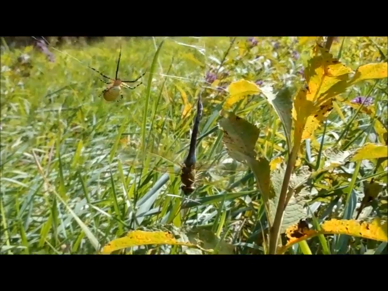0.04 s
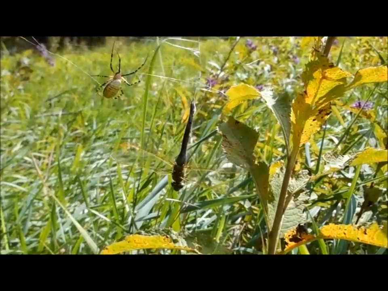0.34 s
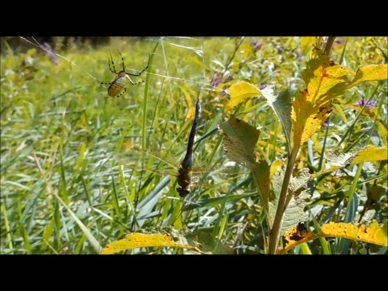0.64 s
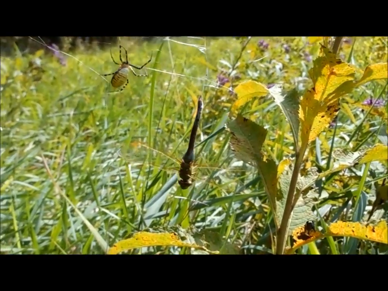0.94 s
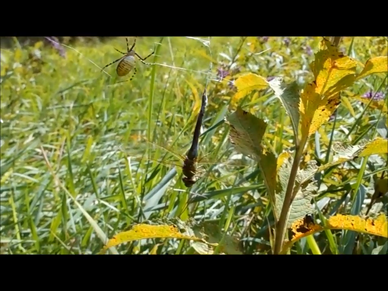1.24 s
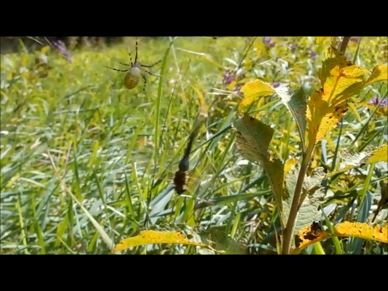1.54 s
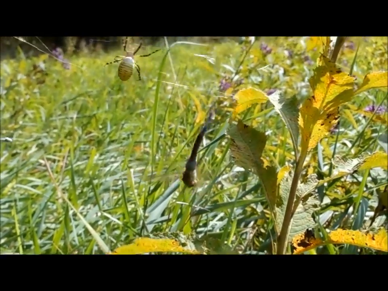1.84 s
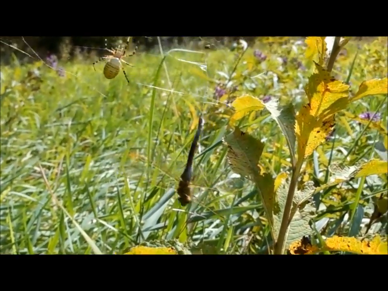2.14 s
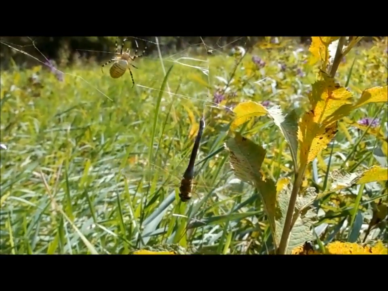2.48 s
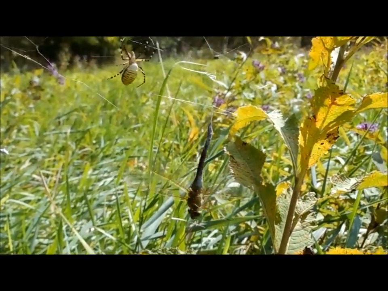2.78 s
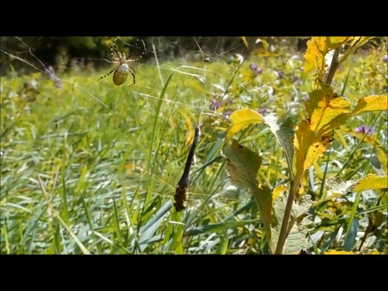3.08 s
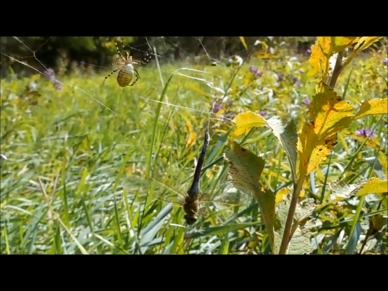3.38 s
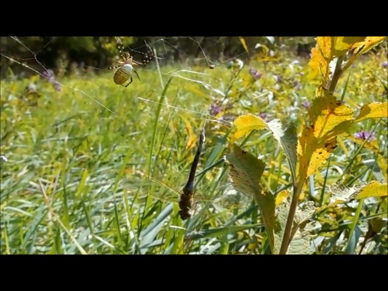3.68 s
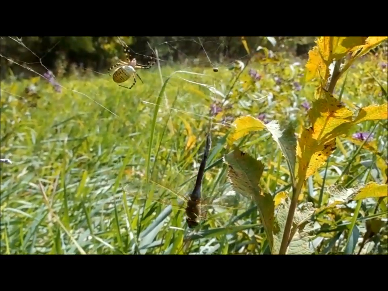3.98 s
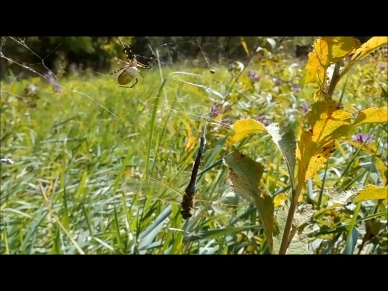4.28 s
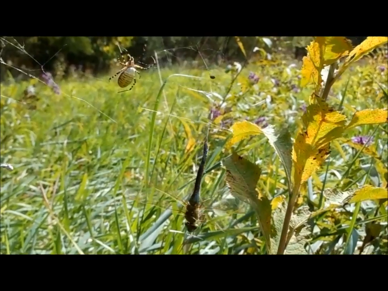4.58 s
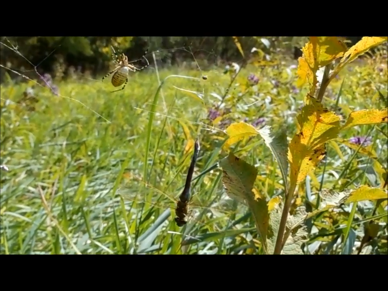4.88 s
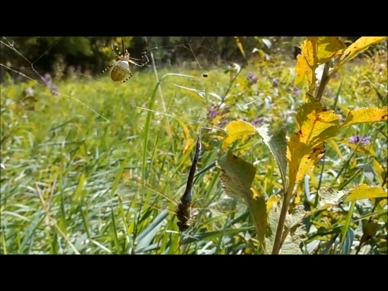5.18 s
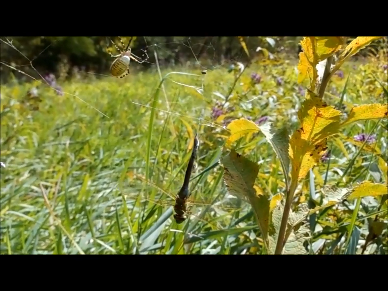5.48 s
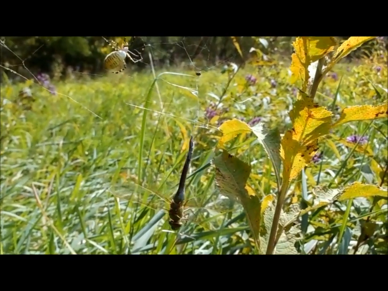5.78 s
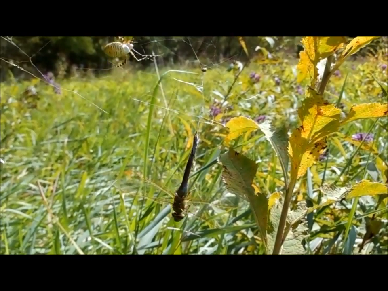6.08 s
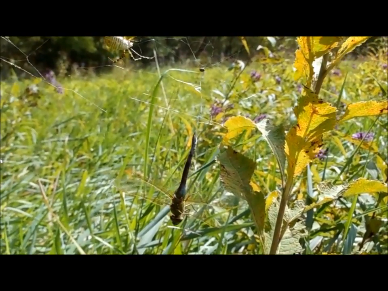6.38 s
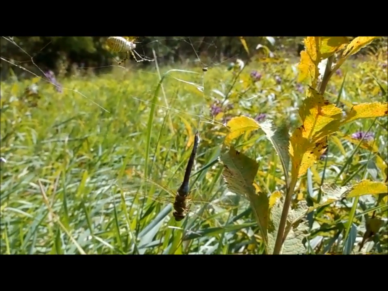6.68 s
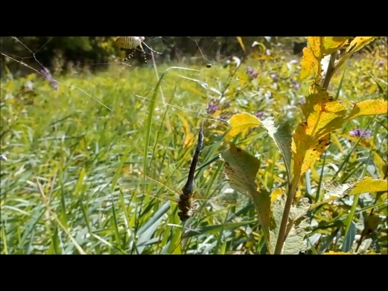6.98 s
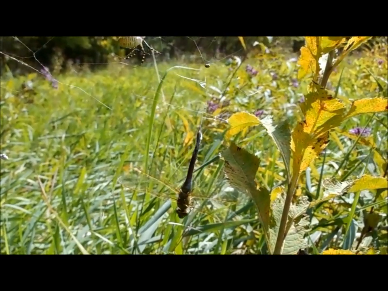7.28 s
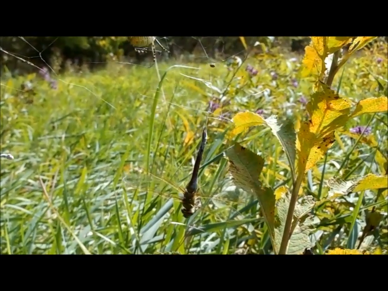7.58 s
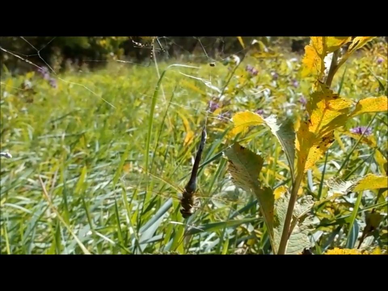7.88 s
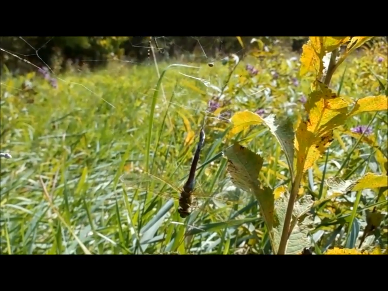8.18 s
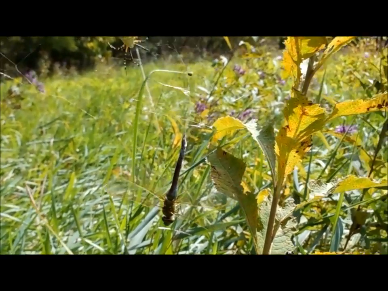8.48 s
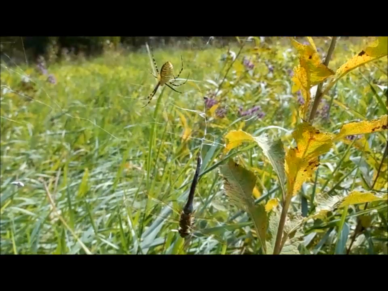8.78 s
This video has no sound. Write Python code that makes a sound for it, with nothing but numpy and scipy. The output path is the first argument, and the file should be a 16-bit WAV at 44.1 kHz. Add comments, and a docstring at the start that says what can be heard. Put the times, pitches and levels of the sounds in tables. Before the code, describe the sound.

In a grassy field, one nearby insect on the left repeats a thin, very high phrase roughly once a second: a few quick ticks, then a short swelling buzz. Early on, dry leaves rustle once. A faint, even hiss of far insects continues throughout, while light gusts rumble softly on the microphone and a barely audible distant engine hums in and out.

```python
"""Katydid in a sunny meadow

Close to the microphone, on the left, a katydid gives three or four ticks and a swelling buzz, over and
over: each wing stroke drags a row of teeth over a scraper and sets the wings ringing near 13 kHz.
Farther out in the grass, katydids and crickets make a steady hiss. Light air puffs on the microphone,
an engine drones in the distance, and dry leaves rustle once."""
import sys
import numpy as np
from scipy import signal
from scipy.fft import rfft, irfft, next_fast_len
from scipy.io import wavfile
from scipy.ndimage import map_coordinates

SR = 44100
rng = np.random.default_rng(int(sys.argv[2]) if len(sys.argv) > 2 else 0)


def unload_wav(signal):
    """Save mono or channel-first audio to the path in sys.argv[1] as 16-bit WAV at rate SR, clipped to [-1, 1]."""
    wavfile.write(
        sys.argv[1],
        SR,
        np.round(np.clip(np.atleast_2d(signal).T, -1, 1) * 32767).astype(np.int16),
    )


N = 394254
TIME = np.arange(N) / SR
FFT_SIZE = next_fast_len(N + SR // 2)
HZ = np.maximum(np.arange(FFT_SIZE // 2 + 1) * SR / FFT_SIZE, 1)
STROKES_PER_S, TEETH_PER_S = 71.0, 1850
LEAD_IN_S = .25  # a phrase opens this long before its buzz, to take in the ticks

# the near katydid's buzzes: (first stroke [s], last stroke [s], relative level [dB], swell time [s],
# shift of the main wing resonance [Hz], its lift [dB], lift of the highest resonance [dB])
BUZZES = [(-0.139, 0.401, -23.5, 0.24, -220, 2.5, 3.5), (1.23, 1.644, -22.5, 0.12, -200, 1, 2.5),
          (2.182, 2.649, -21, 0.07, 30, .5, 1), (3.277, 3.759, -19.5, 0.089, 60, 0.5, 0.7),
          (4.494, 4.946, -20, 0.1, 140, 1, 1), (5.579, 6.032, -21, 0.071, 280, 2, 2.5),
          (6.932, 7.401, -21, 0.077, -50, .5, 1.5), (8.425, 8.718, -20, 0.082, 60, 1, 1.5)]
# single hard strokes leading into a buzz: (time [s], relative level [dB])
TICKS = [(1.073, -17.5), (1.117, -16), (1.161, -15), (1.208, -15), (2.068, -15.5), (2.114, -13.5),
         (2.160, -12.5), (3.164, -14), (3.207, -13), (3.250, -12.5), (4.377, -12.5), (4.421, -12),
         (4.462, -11), (5.460, -14), (5.504, -13), (5.549, -12.5), (6.818, -14.5), (6.860, -12.5),
         (6.900, -13), (8.302, -14), (8.345, -12.5), (8.390, -11.5)]
# scraper pressure through a buzz stroke: (time from the stroke [s], relative level [dB])
BUZZ_STROKE = [(-.008, -8), (-.0062, -6.5), (-.0045, -3.5), (-.002, -1.5), (0, 0.6), (.0018, -12.5),
               (.005, -11)]
# scraper pressure through a tick, which starts harder: (time from the stroke [s], relative level [dB])
TICK_STROKE = [(0, -6), (.002, -7.5), (.0053, -5), (.008, -12.5), (0.011, -13)]
# rasp as the scraper slows at the end of a buzz stroke: (time from the stroke [s], relative level [dB])
STROKE_END = [(.0005, -26), (.0018, -4), (.0032, -10)]
# colour of that rasp: (frequency [Hz], gain [dB])
RASP_COLOUR = [(3500, -39), (4700, -32), (5500, -38.5), (6500, -15), (7700, -16.5), (9600, -3.5),
               (11000, 2), (12500, -18)]
# wing resonances; lower ones speak later, so each stroke falls in pitch:
# (frequency [Hz], width [Hz], gain [dB], lag [s])
WING_MODES = [(7890, 960, -12.5, 0.0032), (9520, 1550, -11, 0.0027), (11270, 860, -1, 0.0016),
              (12320, 910, 4.5, .0012), (13710, 803, 4, 0)]
MAIN_MODE = 3  # row of the strongest resonance
# the near singer's balance at the microphone: (frequency [Hz], left minus right [dB])
SINGER_PAN = [(7200, 0), (8800, 1), (9600, 4), (10500, 2), (11600, 2.2), (12300, 8.3), (12700, 8.3),
              (13100, 3.5), (13900, 5), (14500, 3)]
# how far its left channel lags: (frequency [Hz], phase [rad])
SINGER_PHASE = [(7500, -.1), (9000, 0), (9800, .3), (11400, .35), (12600, 1.6), (13300, 1.3), (13800, 1.2)]
# short waves leave the wings in a new pattern with every tooth: (frequency [Hz], stereo likeness [0-1])
SINGER_LIKENESS = [(7500, .99), (9000, .9), (10000, .78), (12600, .85), (13200, .55)]
# the microphone turning in the hand: (time [s], right channel's lead [samples], left minus right [dB])
MIC_TURN = [(0, 0.091, 0.5), (1.5, 0.47, 1.1), (2.5, 0.17, 0.2), (3.5, 0.099, -0.7), (4.7, .09, -0.8),
            (5.8, .08, 0.1), (7.1, .07, -0.2), (8.6, 0.052, -1)]
# hiss of the far katydids: (frequency [Hz], gain [dB])
HISS_COLOUR = [(7000, -36.5), (9200, -9), (10500, -4), (11500, -1.5), (12300, 6), (13000, 3), (14100, 7),
               (15000, -31)]
# rise and fall of that hiss: (time [s], relative level [dB])
HISS_LEVEL = [(.4, -53), (.7, -59.5), (2, -57), (2.8, -53), (4.2, -52.5), (5.05, -50), (5.4, -54.5),
              (8.2, -53), (8.9, -52)]
# cricket choruses out in the field:
# (pitch [Hz], width [Hz], relative level [dB], left minus right [dB], trill rate [Hz], trill depth [0-1])
CRICKET_CHORUSES = [(4683, 420, -12.5, 0.5, 22, 0.13), (7570, 740, -3, -3.5, 52, 0.22),
                    (7980, 790, -3.5, 12, 23, 0), (8570, 580, -1.5, 4.5, 52, 0.07)]
# rise and fall shared by the choruses: (time [s], level [dB])
CRICKET_LEVEL = [(0, -56), (1, -56.5), (2.8, -53.5), (8.9, -53)]
# murmur of the open field: (frequency [Hz], gain [dB])
MURMUR_COLOUR = [(20, -4), (40, -3.5), (65, -5.5), (115, -7), (170, -11), (250, -14), (350, -17.5),
                 (690, -18), (1300, -22), (2800, -22.5), (4000, -26.5), (6000, -30), (14000, -48)]
# the murmur between 300 and 1400 Hz: (time [s], level [dB])
MURMUR_LEVEL = [(0, -60.5), (1.3, -61), (1.7, -59.5), (3.6, -58), (7.2, -59), (8.65, -58), (8.75, -60)]
# how alike the murmur is left and right: (frequency [Hz], stereo likeness [0-1])
MURMUR_LIKENESS = [(30, 0.88), (100, 0.96), (280, 0.49), (550, 0.55), (1200, 0.91), (2600, 1), (6000, 0.88)]
# gusts on the microphone: (middle [s], length [s], rise [dB])
GUSTS = [(.3, 0.87, 10.5), (0.77, 0.098, 10), (2.618, 0.34, 7.5), (4.575, 0.41, 18), (5.46, 0.086, 12.5),
         (5.942, 0.62, 10), (8.74, 0.079, 8)]
# overtones of the distant engine: (multiple of the cycle rate [-], level [dB])
ENGINE_OVERTONES = [(4, -67.5), (5, -73), (9, -68), (10, -74), (11, -75), (14, -76.5)]
# an overtone swells or sinks as the breeze shifts: (multiple [-], middle [s], length [s], rise [dB])
ENGINE_SWELLS = [(4, 0.86, 0.86, 10), (4, 4.65, 1.5, 10), (4, 5.92, 1.12, 11), (5, 2.9, 1.4, 12),
                 (5, 5.9, 1, 6), (9, 0.31, 0.44, 4.5), (9, 1.53, 0.4, -16), (9, 2.36, 1.03, 8.5),
                 (9, 2.96, 0.14, -11), (9, 3.6, 1.03, 9.5), (9, 8.3, 2.2, 5.5), (9, 8.9, 0.28, -25),
                 (10, 0.25, 0.73, 13), (10, 3.14, 0.63, 21), (10, 3.87, .5, 12.5), (10, 5.2, 0.8, 11),
                 (10, 5.92, 0.55, 11), (11, 0.2, 0.93, 9.5), (11, 2.9, 1.2, 10.5)]
# dry leaves sliding past each other: (middle [s], length [s], relative level [dB])
LEAF_SLIDES = [(1.618, 0.16, -55), (1.783, 0.096, -56.5), (1.863, 0.025, -56), (1.9, 0.11, -66.5)]
# their loudest snaps: (time [s], relative level [dB])
LEAF_SNAPS = [(1.539, -48), (1.579, -38), (1.598, -38.5), (1.647, -34), (1.656, -36.5), (1.704, -41),
              (1.72, -33.5), (1.754, -34.5), (1.764, -36), (1.783, -35), (1.79, -36.5), (1.828, -35.5),
              (1.859, -43)]
# colour of the leaves: (frequency [Hz], gain [dB])
LEAF_COLOUR = [(500, -4), (1200, -7.5), (2700, 1), (4500, -1), (7000, 0.5), (10000, 4.5), (14000, 10)]


def from_db(db):
    """Decibels to gain."""
    return 10 ** (np.asarray(db) / 20)


def rms_one(x):
    """Scale to unit power."""
    return x / np.sqrt(np.mean(x ** 2) + 1e-20)


def in_time(rows):
    """Each column of a table over time, at every sample."""
    times, *columns = np.transpose(rows)
    return [np.interp(TIME, times, column) for column in columns]


def at_hz(points):
    """A table over frequency, joined on a log axis."""
    hz, values = np.transpose(points)
    return np.interp(np.log(HZ), np.log(hz), values)


def colour(x, gain):
    """Filter by a gain for each frequency."""
    return irfft(rfft(x, FFT_SIZE) * gain, FFT_SIZE)[..., :N]


def pan(db):
    """Left and right gains for a level difference."""
    return from_db(np.array([[.5], [-.5]]) * db)


def drift(rate):
    """A random wander of spread near one, turning `rate` times a second."""
    knots = rng.standard_normal(N // 8)
    return np.interp(TIME * rate, np.arange(len(knots)), knots)


def swell(middle_s, length_s):
    """A smooth rise to one and back, above one half for its length."""
    return .5 ** np.minimum((2 * (TIME - middle_s) / length_s) ** 2, 60)


def resonance(x, hz, width_hz):
    """Two-pole resonance with gain one at its peak."""
    radius = np.exp(-np.pi * width_hz / SR)
    feedback = [1, -2 * radius * np.cos(2 * np.pi * hz / SR), radius ** 2]
    return signal.lfilter(np.array([1, 0, -1]) * (1 - radius ** 2) / 2, feedback, x + 1e-18)


def wide_noise(gain, likeness):
    """Coloured stereo noise of unit power, partly alike left and right."""
    alike = np.clip(likeness, -.99, .99)
    mid = colour(rng.standard_normal(N), gain * np.sqrt(1 + alike))
    side = colour(rng.standard_normal(N), gain * np.sqrt(1 - alike))
    return rms_one(np.array([mid + side, mid - side]))


def buzz_strokes(start_db=-15, full_db=2.5, let_go_db=-0.5, tiring=0.029, stumble_s=0.00049):
    """Runs of wing strokes swell, slow a little and end on a lighter one: (time [s], level [dB])."""
    strokes = []
    for first, last, db, swell_s, *_ in BUZZES:
        progress = np.linspace(0, 1, round((last - first) * STROKES_PER_S) + 1)
        for age in (last - first) * (progress - tiring * progress * (1 - progress)):
            effort_db = full_db + start_db * np.exp(-2 * age / swell_s)
            is_last = first + age > last - .5 / STROKES_PER_S
            late_s = stumble_s * rng.standard_normal()
            strokes.append((first + age + late_s, db + effort_db + let_go_db * is_last))
    return strokes


def scraper_pressure(strokes, shape):
    """The scraper bears on the teeth in strokes of one shape, each with its own strength."""
    pressure = np.zeros(N)
    offsets, shape_db = np.transpose(shape)
    for s, db in strokes:
        span = slice(*np.searchsorted(TIME, [s + offsets[0], s + offsets[-1]]))
        pressure[span] += from_db(db + np.interp(TIME[span] - s, offsets, shape_db))
    return pressure


def wings(strikes, pressure, low_cut_hz=4800):
    """The wings ring, held a little differently for each phrase; they are too small to radiate lows."""
    ring = np.zeros_like(strikes)
    for first, last, _, _, shift_hz, main_db, top_db in BUZZES:
        span = slice(*np.searchsorted(TIME, [first - LEAD_IN_S, last + 2 / STROKES_PER_S]))
        for k, (hz, width, db, lag_s) in enumerate(WING_MODES):
            drive = strikes[:, span] * np.interp(TIME[span] - lag_s, TIME[span], pressure[span])
            is_main, is_top = k == MAIN_MODE, k == len(WING_MODES) - 1
            gain = from_db(db + main_db * is_main + top_db * is_top)
            ring[:, span] += (-1) ** k * gain * resonance(drive, hz + shift_hz * is_main, width)
    return signal.sosfilt(signal.butter(4, low_cut_hz, "high", fs=SR, output="sos"), ring)


def near_katydid(jitter=0.3, tooth_spread_db=0.9, knock_hz=4380, knock_width_hz=760):
    """Teeth catch at an uneven pace and each rings the wings, a little differently to left and right."""
    teeth_passed = np.cumsum(TEETH_PER_S * np.exp(jitter * drift(TEETH_PER_S))) / SR
    strikes = np.diff(np.floor(teeth_passed), prepend=0)
    strikes *= from_db(tooth_spread_db * rng.standard_normal(N))
    strokes = buzz_strokes()
    tick_pressure = scraper_pressure(TICKS, TICK_STROKE)
    pressure = tick_pressure + scraper_pressure(strokes, BUZZ_STROKE)
    ahead, sideways = wings(np.array([strikes, strikes * rng.choice([-1, 1], N)]), pressure)
    # the hard stroke of a tick also shakes the whole wing
    shake = resonance(strikes * tick_pressure, knock_hz, knock_width_hz)
    knock = from_db(-33) * resonance(shake, knock_hz, knock_width_hz)
    scrape = np.std(strikes) * rng.standard_normal(N) * scraper_pressure(strokes, STROKE_END)
    rasp = colour(scrape, from_db(at_hz(RASP_COLOUR) - 5) * (HZ > RASP_COLOUR[0][0]))
    alike = at_hz(SINGER_LIKENESS)
    mid = colour(ahead + rasp + knock, np.sqrt(1 + alike))
    side = colour(sideways, np.sqrt(1 - alike))
    level = np.sqrt(np.mean(pressure ** 2)) * from_db(-1.5)
    return rms_one(np.array([mid + side, mid - side])) * level


def grass(x, near_t60_s=0.087, far_t60_s=1.0, first_echo_s=0.00037):
    """Stems around the microphone scatter short waves most: quick echoes, then a faint longer tail."""
    age = TIME[:SR // 2]
    echoes = 0
    for db, t60_s in ((-17, near_t60_s), (-21, far_t60_s)):
        tail = rng.standard_normal((2, len(age))) * from_db(-60 * age / t60_s) * (age > first_echo_s)
        echoes += from_db(db) * tail / np.sqrt(np.sum(tail ** 2, axis=1, keepdims=True))
    treble_tilt = (HZ / 12500) ** 1.2
    return x + colour(x, rfft(echoes, FFT_SIZE) * treble_tilt)


def path_to_microphone(song, echo_s=.000679, echo_db=-15):
    """From close on the left; the microphone shifts in the hand, so each phrase meets new echoes."""
    phrase = np.searchsorted([first - LEAD_IN_S for first, *_ in BUZZES[1:]], TIME)
    scattered = sum(grass(song * (phrase == k)) for k in range(len(BUZZES)))
    left_lag = np.exp(1j * np.array([[-.5], [.5]]) * at_hz(SINGER_PHASE))
    notches = 1 - from_db(echo_db) * np.exp(-2j * np.pi * HZ * echo_s)  # one echo from close by
    return colour(scattered, pan(at_hz(SINGER_PAN)) * left_lag * notches)


def hand_held(song, sway_samples=0.041):
    """As the microphone turns, the singer shifts a little between the channels, in time and level."""
    lead, left_db = in_time(MIC_TURN)
    position = np.arange(N) + lead + sway_samples * drift(7.5)
    right = map_coordinates(song[1], [position], order=5)
    return np.array([song[0], right]) * pan(left_db)


def far_katydids(throb_depth=0.24, chorus_db=8.0, waver_db=2.4):
    """Far across the meadow, many buzzes blur into a hiss that still throbs at the stroke rate."""
    level_db, = in_time(HISS_LEVEL)
    strokes = np.cumsum(STROKES_PER_S * (1 + 0.0327 * drift(3.3))) / SR
    throb = 1 + throb_depth * np.sin(2 * np.pi * strokes)
    hiss = wide_noise(from_db(at_hz(HISS_COLOUR)), likeness=0.25)
    return hiss * throb * from_db(level_db + chorus_db + waver_db * drift(12)) * pan(2.5)


def crickets(flutter_db=2.0):
    """Each kind trills around its own pitch; at a distance the crowd merges into a fluttering band."""
    level_db, = in_time(CRICKET_LEVEL)
    out = 0
    for hz, width, db, pan_db, trill_hz, depth in CRICKET_CHORUSES:
        pulses = np.cumsum(trill_hz * (1 + 0.0507 * drift(4))) / SR
        trill = 1 + depth * np.sin(2 * np.pi * pulses)
        band = 1 / (1 + np.abs(2 * (HZ - hz) / width) ** 2.8)
        crowd = wide_noise(band, likeness=0.8)
        out += crowd * trill * from_db(level_db + db + flutter_db * drift(110)) * pan(pan_db)
    return out


def field_murmur():
    """Light air over the open field makes a soft, broad murmur."""
    level_db, = in_time(MURMUR_LEVEL)
    murmur = wide_noise(from_db(at_hz(MURMUR_COLOUR)), at_hz(MURMUR_LIKENESS))
    midrange = colour(murmur, (HZ > 300) & (HZ < 1400))
    return murmur / np.std(midrange) * from_db(level_db)


def wind_on_microphone(breeze_db=-60, rumble_hz=42, restless_db=3.5):
    """The breeze rumbles on the microphone and rises in short gusts."""
    rumble = wide_noise((HZ / rumble_hz) / (1 + (HZ / rumble_hz) ** 4), likeness=0.35)
    gust_db = sum(db * swell(s, length) for s, length, db in GUSTS)
    return rumble * from_db(breeze_db + gust_db + restless_db * drift(9.9))


def distant_engine(cycle_hz=22.3, wander=0.0032, waver_db=1.5):
    """Overtones of one engine a long way off fade in and out on the breeze."""
    cycles = np.cumsum(cycle_hz * (1 + wander * drift(5))) / SR
    out = 0
    for multiple, db in ENGINE_OVERTONES:
        carried_db = sum(rise * swell(s, length) for k, s, length, rise in ENGINE_SWELLS if k == multiple)
        overtone = np.sqrt(2) * np.sin(2 * np.pi * (multiple * cycles + rng.random()))
        out += overtone * from_db(db + carried_db + waver_db * drift(6.4))
    return out


def dry_leaves(cracks_per_s=4000, spread_db=6.5, snap_t60_s=0.02):
    """Dry leaves in the grass slide in a shower of tiny cracks, with a few sharper snaps."""
    sliding = sum(from_db(db) * swell(s, length) for s, length, db in LEAF_SLIDES)
    sizes = from_db(spread_db * np.minimum(rng.exponential(1, N), 3)) * rng.choice([-1, 1], N)
    cracks = rms_one(sizes * (rng.random(N) < cracks_per_s / SR)) * sliding
    for s, db in LEAF_SNAPS:
        age = np.clip(TIME - s, 0, 1)
        cracks += (age > 0) * from_db(db - 9.5 - 60 * age / snap_t60_s) * rng.standard_normal(N)
    return grass(colour(cracks, from_db(at_hz(LEAF_COLOUR) + 9.5))) * pan(-1)


def scene():
    """One singer close to the microphone, with the meadow spread out behind it."""
    singer = hand_held(path_to_microphone(near_katydid()))
    meadow = far_katydids() + crickets() + field_murmur()
    return singer + meadow + wind_on_microphone() + distant_engine() + dry_leaves()


def record(dry, cutoff_hz=14190):
    """The microphone signal is cut steeply at the top."""
    return signal.sosfilt(signal.ellip(12, .2, 80, cutoff_hz, fs=SR, output="sos"), dry)


dry = scene()
out = record(dry)
unload_wav(out)
```